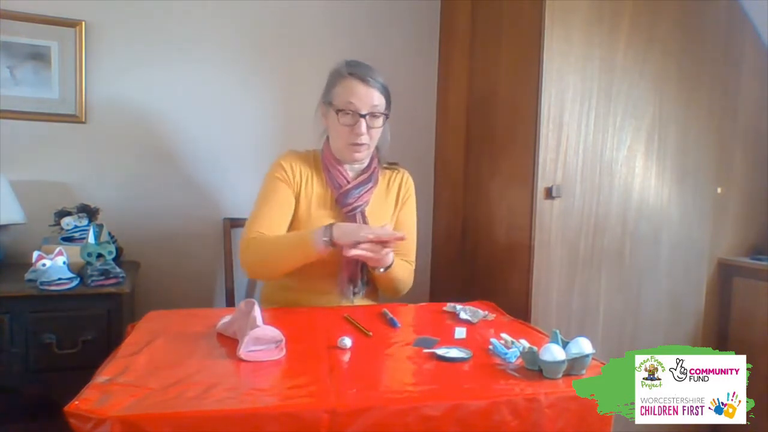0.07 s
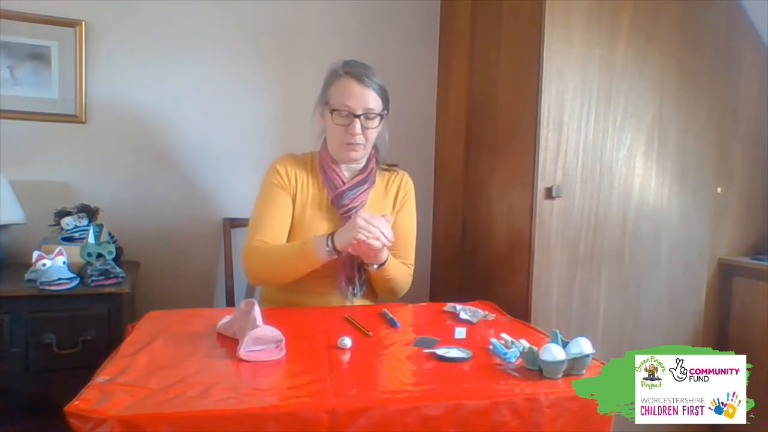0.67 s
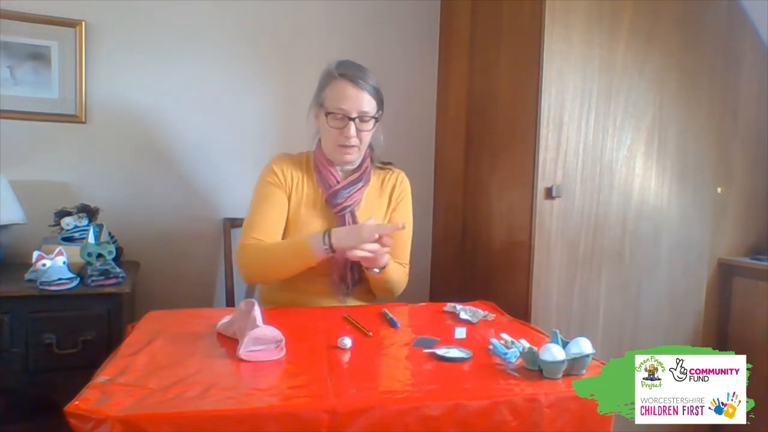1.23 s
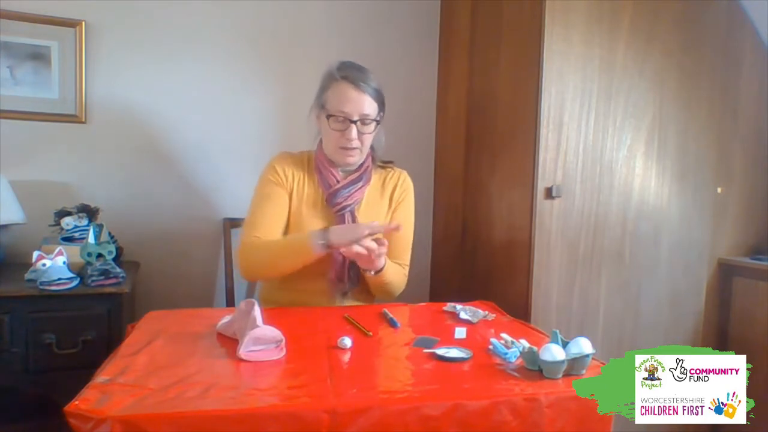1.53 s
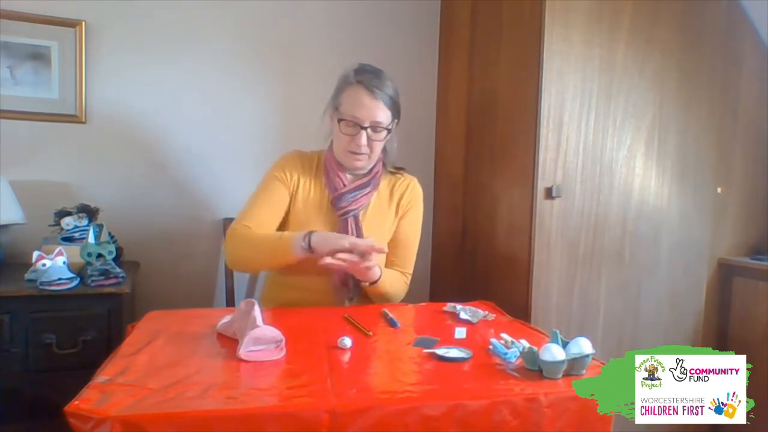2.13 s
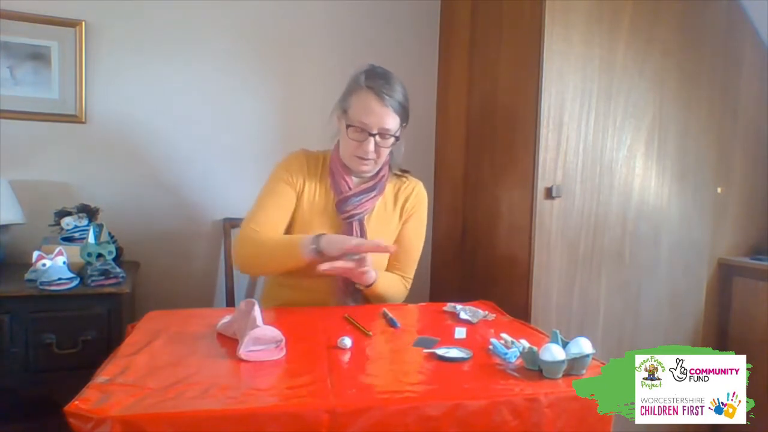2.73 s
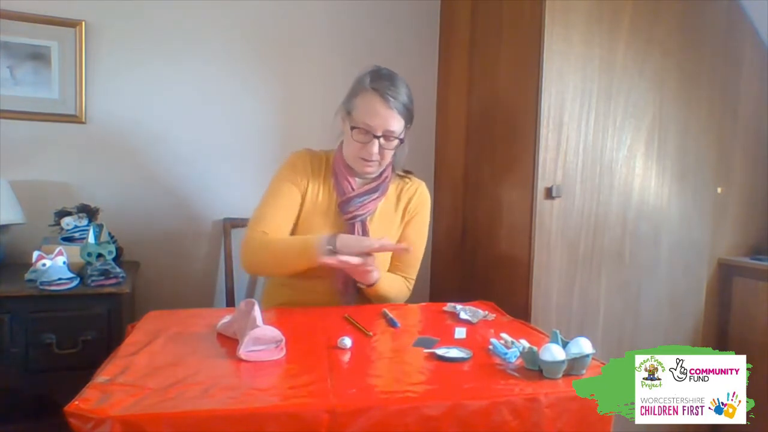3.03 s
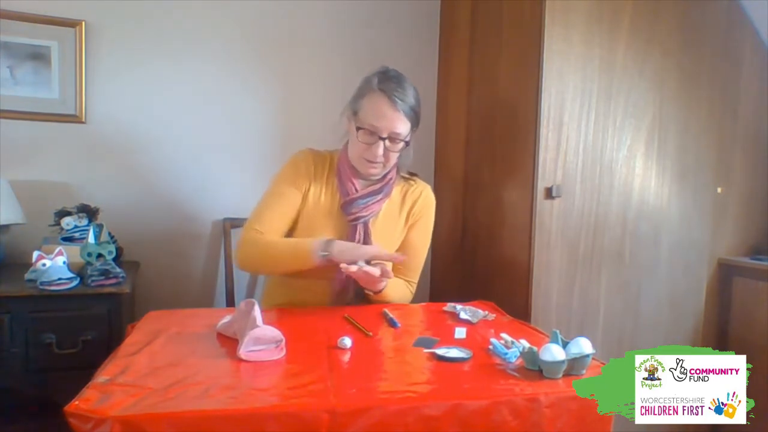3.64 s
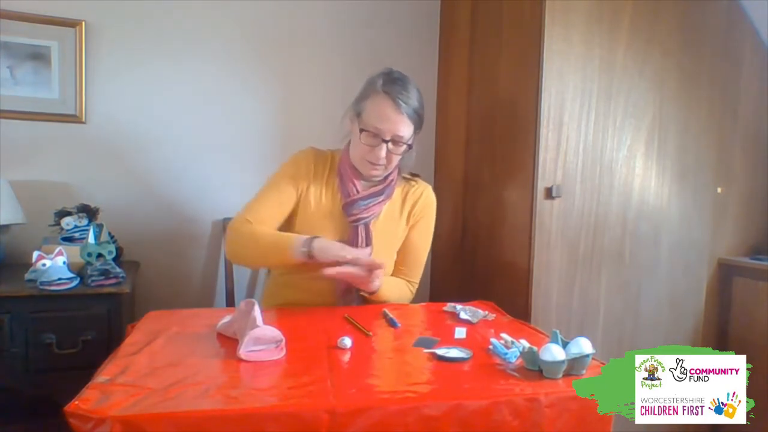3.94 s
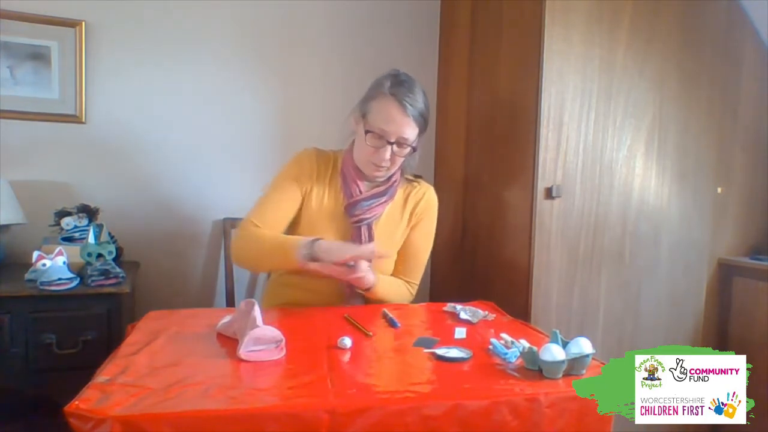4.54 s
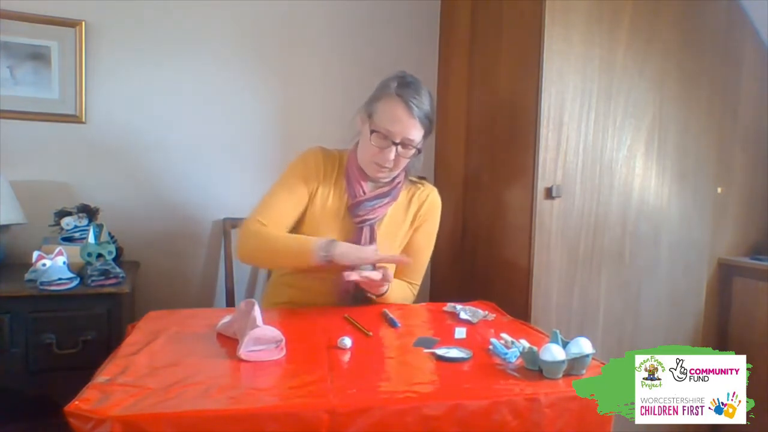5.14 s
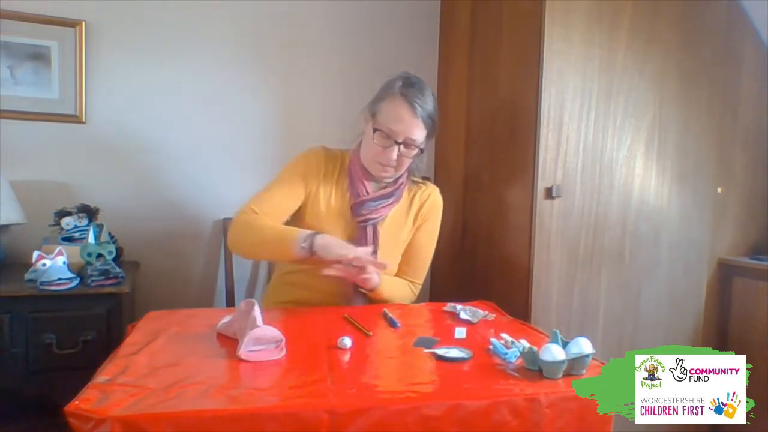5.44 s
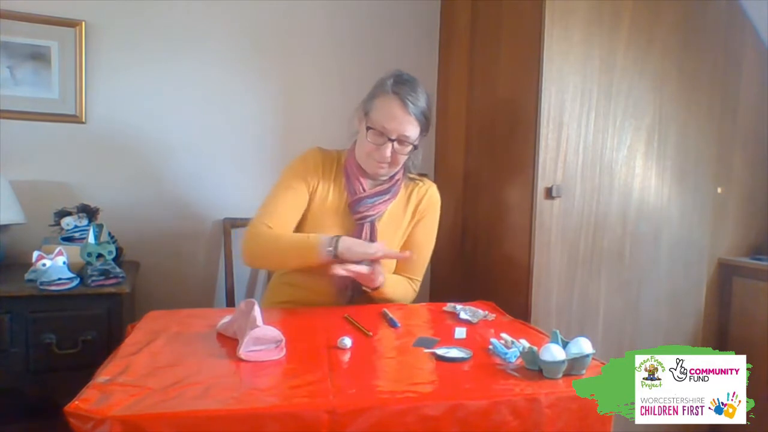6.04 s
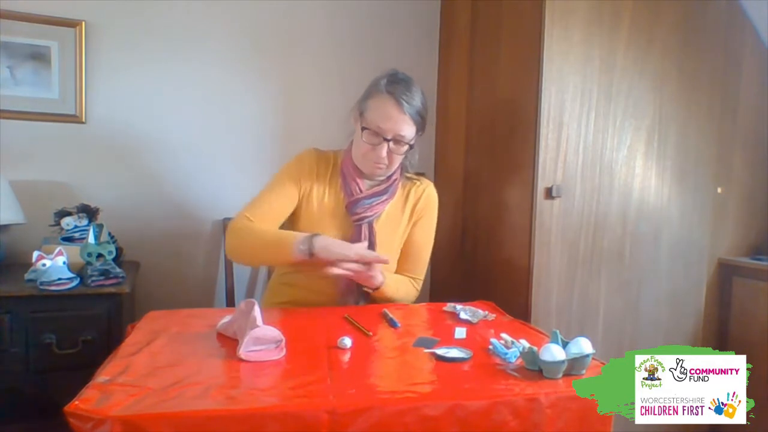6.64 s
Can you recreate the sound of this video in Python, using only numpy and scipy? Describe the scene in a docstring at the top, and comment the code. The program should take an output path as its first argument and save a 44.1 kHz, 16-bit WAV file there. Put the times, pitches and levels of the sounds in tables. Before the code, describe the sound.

A small ball of aluminium foil is rolled between two palms at a table. It crinkles faintly and dryly in quick swells, one for each pass of the hand, with scattered sharper crackles. A soft pop of air comes from the palms about a second in, then the rolling carries on steadily. A small fan hums low in the quiet room. The microphone is about a metre away.

```python
"""A close, dry crinkle comes in swells: a small ball of aluminium foil rolled between two palms at a
table, a metre from a computer's microphone. Each pass of the hand crushes a swarm of tiny creases; now
and then a larger facet buckles with a sharp snap. The air cupped between the palms adds soft knocks
and pops. Underneath, a small fan throbs in a quiet room."""
import sys
import numpy as np
from scipy import signal
from scipy.fft import rfft, irfft, next_fast_len
from scipy.io import wavfile

SR = 44100
rng = np.random.default_rng(int(sys.argv[2]) if len(sys.argv) > 2 else 0)


def unload_audio(sound):
    """Save the sound as a 16-bit wav file, at the path given as the first command line argument."""
    columns = np.transpose(np.atleast_2d(sound))
    # keep every value between -1 and 1, then stretch to whole-number steps
    steps = np.round(np.clip(columns, -1, 1) * 32767)
    wavfile.write(sys.argv[1], SR, steps.astype(np.int16))


N = 304113

# The colour of the room tone. Each row: frequency in Hz, relative spectral level in dB.
AIR_SPECTRUM = [(30, -22), (90, -46), (140, -3), (230, 4), (400, -6.5), (520, -2.5), (660, -7), (830, 1.5),
                (1020, -10.5), (2000, -16.5), (7000, -26.5)]
# Resonances of the case that the fan shakes. Each row: pitch in Hz, Q, relative level in dB.
CASE_MODES = [(174.9, 3.6, 3), (226, 1.6, -3.5)]
# Early reflections off table top, body and walls. Each row: delay in seconds, level in dB.
REFLECTIONS = [(.0013, -25), (.0062, -11.5), (.0078, -15), (0.016, -26.5)]
# The hollow of the palms, knocked by hard snaps and by the hands themselves.
# Each row: start in seconds, pitch in Hz, level in dB, Q.
PALM_KNOCKS = [(0.082, 264, -46.5, 2.6), (0.288, 1120, -41.5, 5.2), (0.416, 130, -56.5, 2),
               (0.443, 226, -51.5, 2), (2.374, 1000, -35.5, 6.1), (3.485, 1025, -41.5, 3.9),
               (5.662, 1060, -42, 3.1), (6.264, 950, -40, 2.1), (6.377, 1010, -50, 1.5)]
# Air popping out as the palms close. Each row: start in seconds, level in dB.
PALM_POPS = [(1.1033, -17.5), (1.119, -31)]
# Resonances of that pocket of air. Each row: pitch in Hz, Q, relative level in dB.
POCKET_MODES = [(525, 3, -23.5), (965, 7.5, -14), (1303, 4.6, 0), (1810, 6.3, -0.5), (2165, 17, -7.5)]
# Larger facets buckling, each with two resonances. Each row: start in seconds, low pitch in Hz, its
# level in dB, high pitch in Hz, its level in dB, Q, the crumbling after it in dB relative to the snap.
FACET_SNAPS = [(0.0029, 2020, -36.5, 4700, -43.5, .8, 2), (0.2885, 1860, -39, 5570, -44, 0.79, 5),
               (0.3004, 1540, -50, 3900, -35, 0.9, 3), (0.3301, 3450, -36, 6400, -38, 2.1, 5.5),
               (0.4161, 2484, -25, 4340, -30, 1.1, 5.5), (1.1045, 4400, -44, 8040, -31, 4.4, -15),
               (1.3097, 2120, -72, 4730, -49, 2.1, -10), (1.4214, 2780, -53, 5250, -48.5, 3.5, -20),
               (1.6051, 3060, -43.5, 4460, -27.5, 1.64, -1.5), (1.7701, 2820, -44.5, 5820, -51, 2, -1),
               (2.008, 2800, -62, 6400, -50, 1.8, -14), (2.1875, 3100, -53, 6400, -47.5, 2.6, -12),
               (2.2232, 1580, -73, 5450, -46, 1.1, -11), (2.3029, 3050, -46, 6440, -45, 3.3, -4),
               (2.374, 2106, -23.5, 5020, -14.5, 1.8, -5.5), (2.3813, 2590, -27.5, 4934, -26.5, 1.3, -2),
               (2.4088, 2230, -53, 6750, -38, 2.5, -5), (2.654, 2810, -65, 5460, -45, 1.9, -10),
               (2.851, 2800, -58, 6050, -47, 1.5, -20), (2.896, 2800, -55, 4940, -44, 1.1, -13),
               (2.9963, 1790, -49.5, 4240, -34.5, 1.7, -4), (3.0152, 2624, -38.5, 4560, -33, 1.24, 2),
               (3.3175, 2040, -64, 6000, -47.5, 2.1, -13), (3.412, 1810, -54.5, 4740, -40.5, 1, -4),
               (3.4863, 2760, -37.5, 6640, -12, 3.5, -23), (3.4935, 2610, -33, 6300, -28, 8.3, -1),
               (3.6329, 2107, -40, 5570, -43, 2.3, -1), (3.7861, 3480, -34.5, 5560, -35.5, 4.4, 0.5),
               (3.7923, 2280, -46, 5870, -37, 2.8, 2), (4.264, 2760, -50, 5850, -44, 1.3, -7),
               (4.455, 2820, -63, 5670, -44.5, 1.2, -18), (4.7496, 1900, -39.5, 4220, -30, 2.5, -6.5),
               (4.7668, 2140, -51, 4320, -35.5, 2.9, -17), (4.8723, 2240, -50.5, 6740, -40, 3.2, -11),
               (5.123, 2720, -47, 5500, -45, 2, -15), (5.155, 2750, -46, 5540, -50, 2.6, -10),
               (5.336, 2820, -50, 5400, -46.5, 1.9, -9), (5.4184, 1990, -70, 4080, -43.5, 1.3, -14.5),
               (5.6612, 2150, -30, 4990, -30, 5.1, -5.5), (5.6626, 3060, -23.5, 5800, -35, 3.2, -5),
               (5.8705, 2190, -35, 6050, -29.5, 2, -0.5), (5.9714, 1720, -41, 4900, -25, 1.8, -14),
               (6.0419, 2810, -50, 5760, -44, 1.6, -13), (6.161, 1920, -48.5, 4840, -41, 1.5, -7),
               (6.2618, 2793, -28.5, 5820, -26, 2.1, -6), (6.3747, 2500, -32.5, 5680, -33.5, 2, -4.5),
               (6.6111, 3600, -50, 6000, -43.5, 1.5, 1.5), (6.733, 2780, -47, 5440, -44, 1.8, -8)]
# The colour of the crinkle. Each row: frequency in Hz, EQ gain in dB.
CRINKLE_EQ = [(200, -22), (500, -24), (1000, -6.5), (1500, -2), (2100, 3), (3000, 2.5), (4500, -1),
              (6200, -2), (8000, -1), (11000, -20.5)]
# The light bed of crinkle while the ball just touches the palms. Each row: time in seconds, level in dB.
LIGHT_CONTACT = [(0, -60), (.48, -63), (.68, -78), (.9, -74), (1.15, -65), (2, -68), (2.45, -62),
                 (2.85, -66), (3.3, -65), (3.7, -59), (4.2, -65), (4.85, -57), (5.3, -63), (6, -57),
                 (6.9, -60)]
# Bouts of even rolling, one swell to a pass of the palm. Each row: first pass in seconds, last pass
# in seconds, number of passes, level in dB, treble tilt in dB.
ROLLING_BOUTS = [(0.084, 0.165, 2, -56, 8), (0.962, 1.1, 2, -54, -3), (1.232, 1.534, 4, -56, 0),
                 (1.672, 2.105, 5, -59, -1), (2.235, 2.567, 5, -56, 1.5), (2.698, 3.439, 7, -57.5, 3),
                 (3.603, 4.1, 5, -55, 4), (4.204, 4.395, 3, -58, -4.5), (4.526, 5.251, 7, -58.5, -3.5),
                 (5.408, 5.836, 6, -57.5, 0), (6.038, 6.442, 6, -57.5, -4), (6.52, 6.823, 5, -60.5, 0)]
# Single harder squeezes. Each row: peak in seconds, level in dB, rise in seconds, fall in seconds.
HARD_SQUEEZES = [(0.345, -45, 0.07, 0.034), (0.439, -35.5, 0.029, 0.0069), (0.73, -69.5, 0.012, 0.011),
                 (2.375, -50.5, 0.013, 0.03), (2.701, -53, 0.03, 0.013), (3.165, -56.5, .006, 0.023),
                 (3.499, -40.5, 0.0086, 0.013), (3.615, -51.5, 0.016, 0.037), (3.95, -50.5, 0.0089, 0.018),
                 (4.1, -54, 0.035, 0.014), (4.278, -53.5, 0.0088, 0.026), (4.515, -52, 0.006, 0.058),
                 (4.741, -46.5, 0.0037, 0.021), (5.125, -54, 0.0058, .035), (5.182, -50, 0.0045, 0.012),
                 (5.41, -57.5, 0.0093, 0.025), (5.49, -52.5, 0.032, 0.0099), (5.742, -53.5, .012, 0.034),
                 (5.997, -45, 0.023, 0.0068), (6.1, -56, 0.033, .02), (6.27, -47.5, .012, 0.0098),
                 (6.676, -54.5, .01, 0.067)]

AIR_DB, FAN_DB, FAN_TURNS_PER_S = -70, -74, 29.35
PASS_RISE_S, PASS_FALL_S = 0.017, 0.027
CONTACT_TILT_DB, SQUEEZE_TILT_DB, TILT_PIVOT_HZ = 2, 4.5, 3400
CRUMBLE_T60_S, T60_DOUBLES_DB = 0.07, 12.5   # decay of a 0 dB crumbling; extra level that doubles it
MIC_EDGE_HZ, CUTOFF_HZ = 6817, 15700
HIT_GAIN = np.sqrt(SR / 1000)   # gives a unit-energy hit the energy of one millisecond at rms 1


def from_db(db):
    """Decibels to gain."""
    return 10 ** (np.asarray(db) / 20)


def rms_one(x):
    """Scale to rms 1."""
    return x / np.sqrt(np.mean(x ** 2) + 1e-20)


def energy_one(x):
    """Scale to a sum of squares of 1."""
    return x / np.sqrt(np.sum(x ** 2) + 1e-20)


def add(out, s, sound):
    """Mix a sound into out from s seconds on."""
    start = int(np.clip(round(s * SR), 0, N - 1))
    out[start:start + len(sound)] += sound[:N - start]


def resonate(x, hz, q):
    """A resonance with steep skirts, about hz / q wide."""
    half_width = np.exp(.5 / max(q, .5))
    edges = [hz / half_width, min(hz * half_width, .45 * SR)]
    return signal.sosfilt(signal.butter(2, edges, "band", fs=SR, output="sos"), x + 1e-18)


def colour(x, spectrum):
    """EQ x with a smooth (Hz, dB) curve and scale it to rms 1."""
    hz, db = np.transpose(spectrum)
    size = next_fast_len(N)
    bin_hz = np.maximum(np.arange(size // 2 + 1) * SR / size, 1)
    gain = from_db(np.interp(np.log(bin_hz), np.log(hz), db))
    return rms_one(irfft(rfft(x, size) * gain, size)[:N])


def clicks(size, per_s, spread_db, top_db):
    """Random clicks of either sign: many weak, a few strong."""
    fires = rng.random(size) < per_s / SR
    strength_db = np.minimum(spread_db * rng.exponential(1, size), top_db)
    return fires * from_db(strength_db) * rng.choice([-1, 1], size)


def room(x, diffuse_db, t60, stretches):
    """Direct sound, near echoes and a short tail; the hands move, so each stretch gets its own."""
    out, t = np.zeros(N), np.arange(SR // 4) / SR
    for stretch in np.array_split(np.arange(N), stretches):
        tail = rng.standard_normal(len(t)) * from_db(-60 * t / t60)
        response = from_db(diffuse_db) * energy_one(tail)
        response[0] += 1
        for delay, db in REFLECTIONS:
            response[int(delay * rng.uniform(.85, 1.15) * SR)] += from_db(db)
        add(out, stretch[0] / SR, signal.fftconvolve(x[stretch], energy_one(response)))
    return out


def room_air():
    """The air of the room: a faint, steady bed of dark noise."""
    return from_db(AIR_DB) * colour(rng.standard_normal(N), AIR_SPECTRUM)


def fan():
    """One slightly uneven knock a turn sets the fan's case humming."""
    knocks = np.zeros(N)
    for turn in range(int(N / SR * FAN_TURNS_PER_S)):
        late_s, strength_db = rng.normal(0, 0.00017), rng.normal(0, 3.2)
        add(knocks, turn / FAN_TURNS_PER_S + late_s, from_db([strength_db]))
    hum = sum(from_db(db) * rms_one(resonate(knocks, hz, q)) for hz, q, db in CASE_MODES)
    return from_db(FAN_DB) * rms_one(hum)


def palm_knocks():
    """Knocked, the hollow between the palms rings for a few cycles."""
    out, push = np.zeros(N), signal.unit_impulse(SR // 10)
    for s, hz, db, q in PALM_KNOCKS:
        add(out, s - .0004, from_db(db) * HIT_GAIN * energy_one(resonate(push, hz, q)))
    return out


def palm_pops():
    """A soft puff rings the pocket of air between the palms; skin swallows the treble."""
    out, puff = np.zeros(N), signal.unit_impulse(SR // 10)
    ring = sum(from_db(db) * energy_one(resonate(puff, hz, q)) for hz, q, db in POCKET_MODES)
    muffled = signal.sosfilt(signal.butter(8, 2400, fs=SR, output="sos"), ring)
    for s, db in PALM_POPS:
        add(out, s - .001, from_db(db) * HIT_GAIN * muffled)
    return out


def palm_pressure():
    """Passes and squeezes swell and fade over the light contact; returns gain and treble tilt in dB."""
    t = np.arange(N) / SR
    swells = [(s, db, PASS_RISE_S, PASS_FALL_S, tilt_db)
              for first, last, passes, db, tilt_db in ROLLING_BOUTS
              for s in np.linspace(first, last, round(passes))]
    swells += [(*squeeze, SQUEEZE_TILT_DB) for squeeze in HARD_SQUEEZES]
    power = from_db(np.interp(t, *np.transpose(LIGHT_CONTACT))) ** 2
    weighted_tilt = power * CONTACT_TILT_DB
    for s, db, rise, fall, tilt_db in swells:
        near = slice(max(0, int((s - .5) * SR)), int((s + 1) * SR))
        since = t[near] - s
        swell = from_db(db) ** 2 * np.exp(-np.where(since < 0, (since / rise) ** 2, since / fall))
        power[near] += swell
        weighted_tilt[near] += swell * tilt_db
    return np.sqrt(power), weighted_tilt / power


def small_facets(pressure, per_s=2.0, low_hz=2680, high_hz=5700, q=2.1, crumble_db=-16):
    """Small facets buckle at random, as hard as the palms press; returns rows like FACET_SNAPS."""
    rows = []
    for at in rng.integers(0, N, int(per_s * N / SR)):
        detune = 2 ** rng.normal(0, .15)
        db = 20 * np.log10(pressure[at]) + rng.normal(0, 1)
        rows.append((at / SR, low_hz * detune, db + 5, high_hz * detune, db + 11, q, crumble_db))
    return rows


def shimmer(force, hz, modes=3, width_hz=90):
    """The sheet around a facet rings on briefly in narrow modes scattered about the facet's pitch."""
    pitches = hz * 2 ** (np.linspace(-.3, .3, modes) + rng.normal(0, 0.044, modes))
    rings = [rng.choice([-1, 1]) * resonate(force, min(f, 7600), q=f / width_hz) for f in pitches]
    return energy_one(sum(rings))


def snaps(facets):
    """Each facet flips with one click and sets off a dying cascade of smaller ones."""
    out, t = np.zeros(N), np.arange(SR // 6) / SR
    flip = signal.unit_impulse(len(t))
    for s, low_hz, low_db, high_hz, high_db, q, crumble_db in facets:
        t60 = max(CRUMBLE_T60_S * 2 ** (crumble_db / T60_DOUBLES_DB), .01)
        cascade = clicks(len(t), per_s=2400, spread_db=3.0, top_db=22.5) * from_db(-60 * t / t60)
        force = flip + from_db(crumble_db) * energy_one(cascade)
        for hz, db in (low_hz, low_db), (high_hz, high_db):
            ring = energy_one(resonate(force, hz, q)) * np.sqrt(np.sum(force ** 2))
            ring += from_db(crumble_db - 1.5) * shimmer(force, hz)
            ring += from_db(-20.5) * flip   # the bare click on the attack
            add(out, s - .0004, from_db(db) * HIT_GAIN * ring)
    # facets this small radiate hardly any bass
    return signal.sosfilt(signal.butter(3, 900, "high", fs=SR, output="sos"), out + 1e-18)


def creases(bands=12):
    """Tiny creases give way at random and ring briefly; the small, high ones tick most distinctly."""
    out = np.zeros(N)
    for hz in np.geomspace(1100, 7500, bands):
        top_db = 15 + 3 * np.log2(hz / 3000)
        crackle = clicks(N, per_s=420, spread_db=6.0, top_db=top_db)
        out += np.sqrt(hz) * rms_one(resonate(crackle, hz, q=2.37))
    return rms_one(out)


def rolling(pressure, tilt_db):
    """Crinkle, bright ticks and the soft hiss of skin on foil, all riding the pressure of the palms."""
    sparse_clicks = clicks(N, per_s=55, spread_db=6.5, top_db=13)
    ticks = rms_one(resonate(sparse_clicks, hz=5260, q=0.94))
    crinkle = creases()
    skin_hiss = rng.standard_normal(N)
    texture = crinkle + from_db(-4) * ticks + from_db(-12.5) * skin_hiss
    texture = colour(room(texture, diffuse_db=1.5, t60=0.074, stretches=50), CRINKLE_EQ)
    body = signal.sosfiltfilt(signal.butter(2, TILT_PIVOT_HZ, fs=SR, output="sos"), texture)
    treble = texture - body
    return pressure * (body * from_db(-tilt_db / 2) + treble * from_db(tilt_db / 2))


def scene():
    """The mono mix: foil and hands up front, fan and room air behind."""
    pressure, tilt_db = palm_pressure()
    facets = list(FACET_SNAPS) + small_facets(pressure)
    hits = snaps(facets) + palm_knocks() + palm_pops()
    hits = room(hits, diffuse_db=-8.5, t60=0.071, stretches=12)
    return (room_air() + hits + rolling(pressure, tilt_db) + fan())[None, :]


def record(dry):
    """A speech-band microphone with faint hiss: only a trace of treble gets past its steep edge."""
    speech_band = signal.sosfilt(signal.butter(12, MIC_EDGE_HZ, fs=SR, output="sos"), dry)
    leak = from_db(-29) * dry
    hiss = from_db(-95.5) * rng.standard_normal(dry.shape)
    top_cut = signal.ellip(10, .1, 80, CUTOFF_HZ, fs=SR, output="sos")
    return signal.sosfilt(top_cut, speech_band + leak + hiss)


dry = scene()
out = record(dry)
unload_audio(out)
```